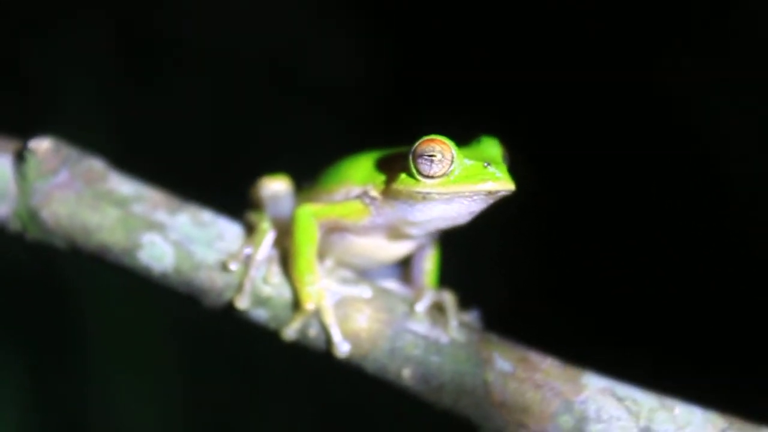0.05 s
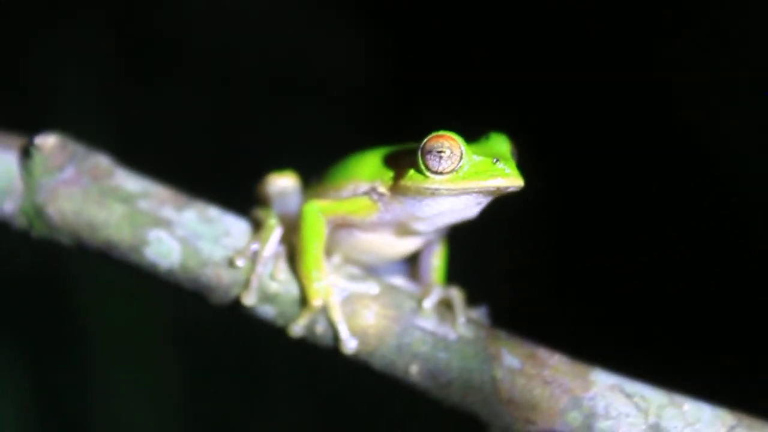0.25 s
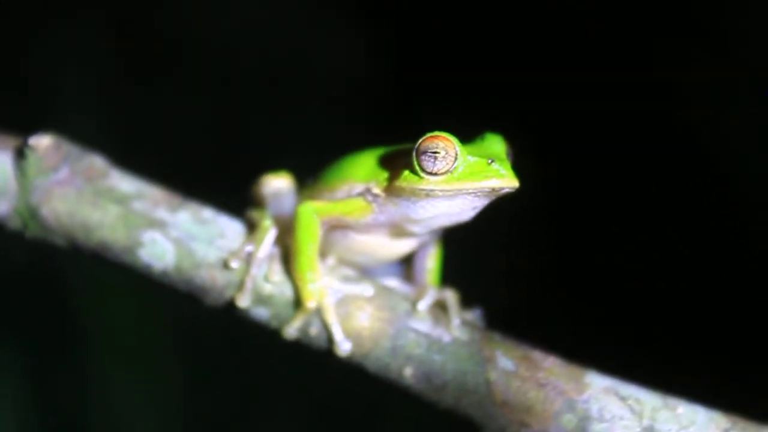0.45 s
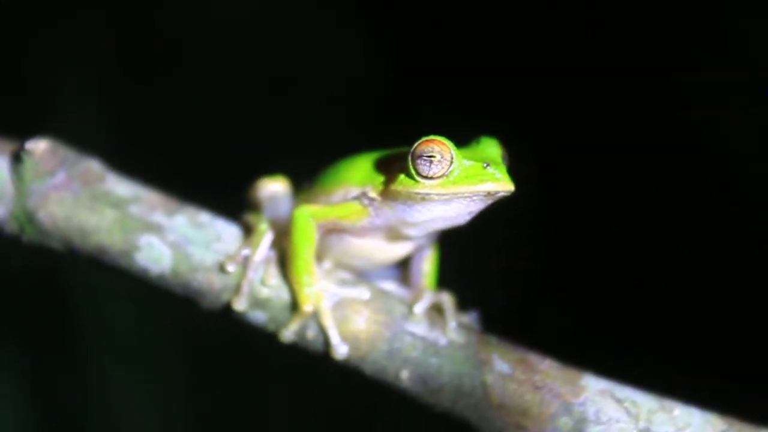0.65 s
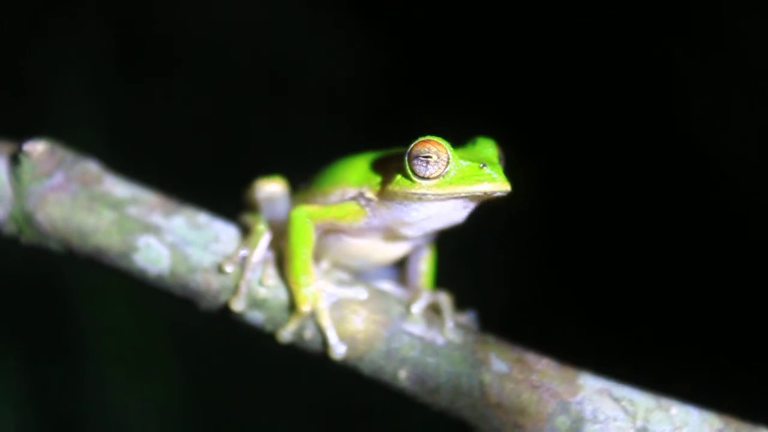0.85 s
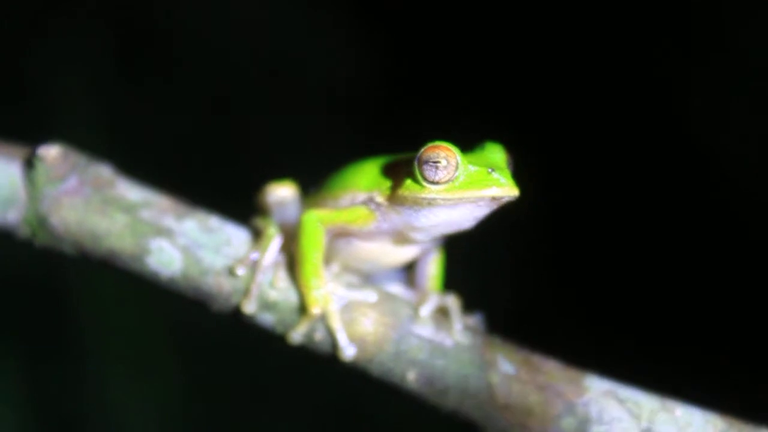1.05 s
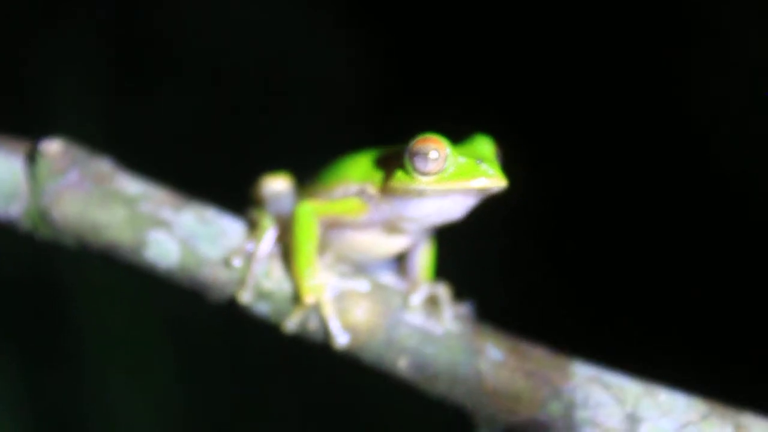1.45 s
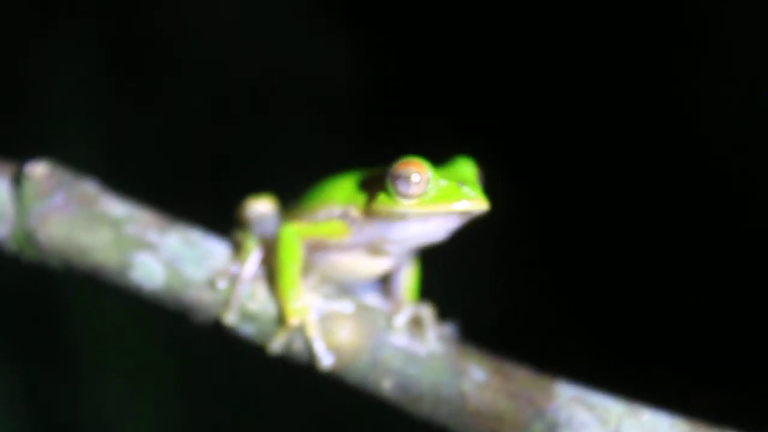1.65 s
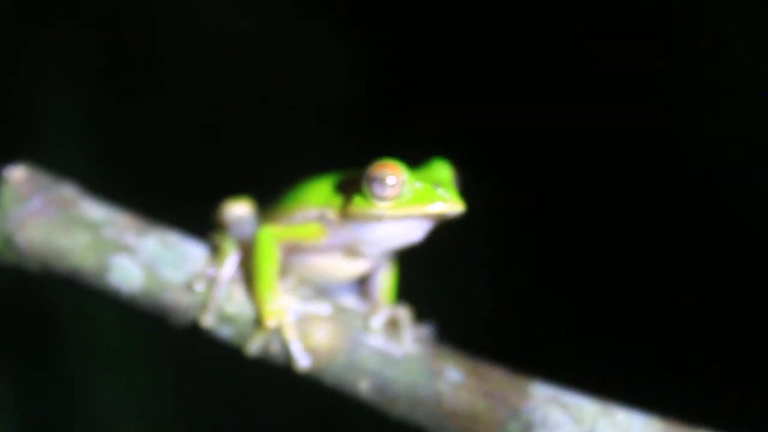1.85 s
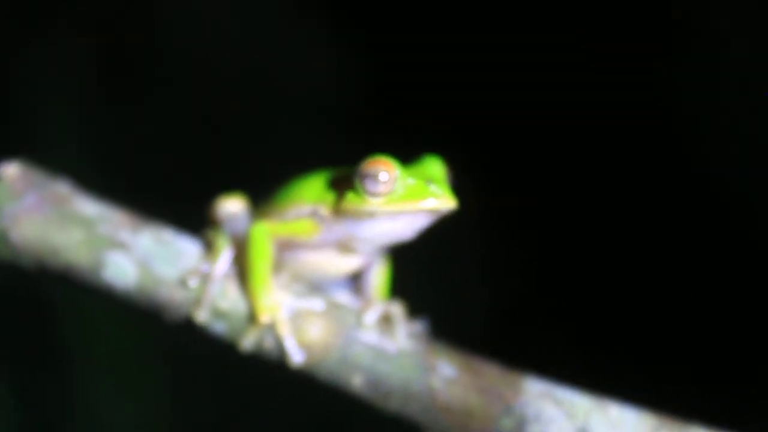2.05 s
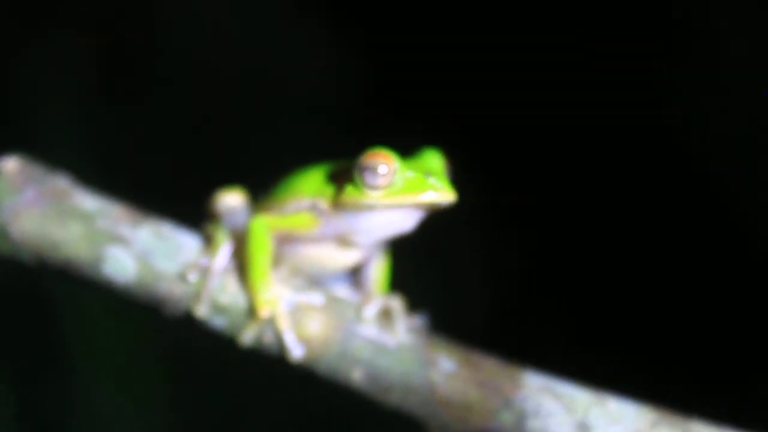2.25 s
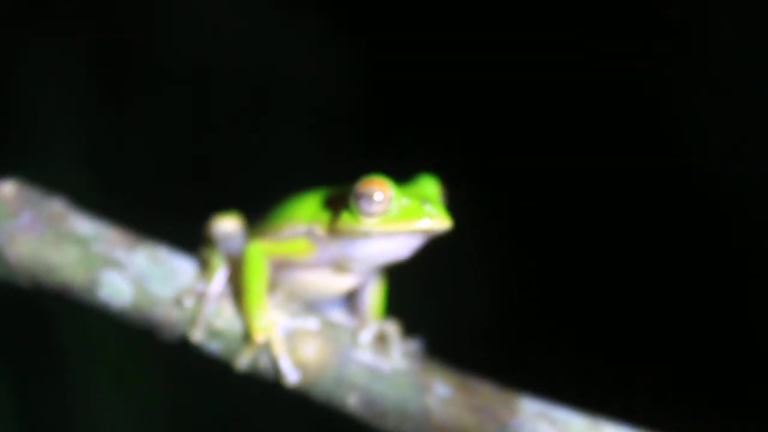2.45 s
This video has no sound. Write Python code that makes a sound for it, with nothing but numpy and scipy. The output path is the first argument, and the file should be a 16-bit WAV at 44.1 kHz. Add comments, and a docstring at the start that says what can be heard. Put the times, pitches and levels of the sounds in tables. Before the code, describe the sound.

Tree frogs rasping, clucking and squeaking at night over a steady insect hum.

```python
"""Tree frogs at night: three swelling rasps, with sharp clucks and thin nasal squeaks between them.
Each call is a pulse train ringing a throat near 3 kHz; a faint high overtone sinks through each rasp.
Foliage scatters the calls briefly. A hand lightly bumps the camera: dull, decaying noise bursts.
Behind: a steady insect band, soft hiss and low rumble, all filtered noise."""
import sys
import numpy as np
from scipy import signal
from scipy.io import wavfile
from scipy.ndimage import uniform_filter1d

SR = 44100
rng = np.random.default_rng(int(sys.argv[2]) if len(sys.argv) > 2 else 0)


def put_to_file(sound):
    """Save the sound as 16-bit audio at rate SR, in the file named by the first command-line argument."""
    columns = np.atleast_2d(sound).T  # one column per channel
    safe = np.clip(columns, -1, 1)
    whole_steps = np.round(safe * 32767)
    wavfile.write(sys.argv[1], SR, whole_steps.astype(np.int16))


N = 114660
TIME_S = np.arange(N) / SR

# envelope per rasp, before the trims in rasp(): time_s, body_db, treble_db
RASP_ENVELOPES = [
    [(0.44, -51, -52), (0.486, -30.5, -49), (0.562, -20.5, -42.5), (0.582, -27, -42.5),
     (0.604, -12.5, -38.5), (0.63, -23, -55), (0.678, -33, -59), (0.69, -44, -56)],
    [(1.21, -25, -56), (1.218, -34, -53), (1.276, -24, -46), (1.292, -35, -52), (1.306, -20.5, -45.5),
     (1.336, -37, -54), (1.342, -27, -41.5), (1.356, -16.5, -51), (1.374, -32.5, -64), (1.39, -35, -74),
     (1.408, -44, -67), (1.42, -49, -74)],
    [(1.78, -49, -72), (1.788, -47, -74), (1.812, -31, -58), (1.856, -32, -53), (1.864, -22, -51),
     (1.918, -26, -47.5), (2.064, -20, -42), (2.072, -30, -53), (2.078, -15.5, -52), (2.094, -18, -37.5),
     (2.128, -15.5, -52), (2.144, -27, -62), (2.15, -46, -54)],
]
# throat per rasp: ring_hz, start_ring_gain, end_ring_gain, median_pulse_hz, slip_cycles
RASP_THROATS = [(3230, 0.18, 2.6, 340, 0.2), (3225, 3.9, 4.3, 440, .15), (3262, 0.3, 3.2, 330, .25)]
# rasp body spectrum: freq_hz, gain_db
RASP_SPECTRUM = [(300, -45), (1500, -29), (1850, -20), (2120, 0), (2450, -6.5), (2850, 3), (3300, -1.5),
                 (3700, -6), (4900, -12), (5800, -17.5), (9000, -49.5)]
# rasp treble spectrum: freq_hz, gain_db
RASP_TREBLE_SPECTRUM = [(2000, -30.5), (4000, -1.5), (5300, 8), (6200, 1), (7500, -1), (9500, -8),
                        (11000, -17), (16000, -7)]
# whistle above each rasp: start_s, end_s, level_db
RASP_OVERTONES = [(0.445, 0.627, -52), (1.18, 1.378, -56), (1.885, 2.142, -52)]
# clucks: start_s, length_s, level_db, pulse_hz, throat_hz, snap_db
CLUCK_CALLS = [(0.3182, .005, -18.5, 590, 2850, -1.5), (0.332, .010, -27, 510, 3450, 3),
               (0.4097, 0.0087, -29.5, 600, 2420, 3.5), (.7838, 0.011, -17.5, 730, 3380, -3),
               (.8133, .004, -20.5, 610, 3150, -13), (0.817, 0.012, -26.5, 380, 3330, 2),
               (0.852, 0.0041, -14.5, 480, 2670, 1), (.8975, 0.00191, -21, 520, 3300, -4),
               (0.9338, 0.0058, -16, 530, 2980, 3), (0.941, .004, -24.5, 650, 3050, 3),
               (1.024, 0.0074, -17.5, 730, 2970, -2.5), (1.1037, 0.0039, -15, 880, 2720, 0),
               (1.1095, 0.0081, -15, 730, 2900, 0), (1.121, 0.005, -19, 610, 2850, -7),
               (1.1907, 0.011, -18.5, 950, 2260, -6.5), (1.34, 0.017, -26, 275, 3440, 0.5),
               (1.463, 0.0036, -30, 640, 2650, -1), (1.756, 0.0093, -42, 600, 2730, -6),
               (1.8637, 0.0039, -21, 732, 2850, -17), (1.867, 0.045, -30, 183, 2130, -8),
               (2.005, 0.0042, -18, 670, 3400, -17), (2.0805, 0.0095, -22.5, 640, 2920, -2),
               (2.151, 0.004, -18, 920, 2760, -14), (2.1573, 0.0043, -28, 680, 2680, -12),
               (2.2054, 0.0037, -25.5, 560, 2600, -11), (2.216, .011, -30, 640, 2950, -11),
               (2.3078, 0.0059, -29.5, 500, 2630, -12)]
# cluck body spectrum: freq_hz, gain_db
CLUCK_SPECTRUM = [(300, -56), (1100, -32.5), (1600, -15.5), (2150, -2), (2700, 1), (3300, 2), (3800, -6.5),
                  (4400, -13.5), (5500, -14), (7000, -23), (10000, -31), (13000, -32.5), (16000, -36)]
# squeaks, near and far: start_s, length_s, level_db, start_hz, middle_hz, end_hz
SQUEAK_CALLS = [(0.077, .07, -46, 492, 509, 476), (0.219, 0.091, -34.5, 432, 499, 464),
                (0.341, 0.066, -38.5, 445, 431, 407), (0.408, 0.071, -34.5, 610, 567.5, 542),
                (0.689, 0.048, -31.5, 622, 645, 678), (0.726, 0.02, -32.5, 560, 579.5, 590),
                (0.745, 0.044, -28.5, 589, 582, 568), (0.797, 0.046, -34.5, 541, 542, 510),
                (0.896, .03, -34, 530, 528, 535), (0.943, 0.046, -33, 530, 523, 480),
                (1.011, .074, -28.5, 501.3, 568.4, 516), (1.126, 0.055, -40, 545.7, 555, 530),
                (1.549, 0.1, -50, 531, 552, 539), (2.159, 0.029, -39, 551, 533, 514),
                (2.212, 0.052, -39.5, 441, 446, 427), (2.31, 0.032, -40.5, 459, 469, 476),
                (2.445, 0.088, -51, 503, 503, 510)]
# squeak body spectrum: freq_hz, gain_db
SQUEAK_SPECTRUM = [(400, -42), (1300, -18), (1700, -14.5), (2200, 0), (2900, 6), (3400, -2.5), (3900, -9.5),
                   (5000, -18.5), (7000, -29.5), (11000, -35), (16000, -37)]
# hand knocks: start_s, gain_db, decay_s
CAMERA_BUMPS = [(1.234, -34.5, 0.0085), (1.260, -37.5, 0.0069), (1.294, -35, 0.0077), (1.308, -37, 0.019),
                (1.34, -33, 0.015)]
# camera body response: freq_hz, gain_db
BUMP_SPECTRUM = [(40, -20), (100, -12), (180, 2), (450, -2.5), (700, -8.5), (1400, -20), (3000, -39)]
# insect band: freq_hz, gain_db
INSECT_SPECTRUM = [(3600, -39), (4150, -11), (4450, -5), (4850, -1), (5100, -6.5), (5450, -21),
                   (6200, -49.5)]
# wide hiss with a low end: freq_hz, gain_db
HISS_SPECTRUM = [(25, -19), (45, -12.5), (87, -3), (185, -3.5), (250, -9.5), (550, -11.5), (1000, -6.5),
                 (1600, -14.5), (2600, -10), (3300, -14), (3800, -22), (5000, -23.5), (6000, -31),
                 (7700, -24), (8500, -28), (14000, -31), (16000, -41)]
# hiss level: time_s, level_db
HISS_ENVELOPE = [(0, -45), (1.3, -44.5), (1.7, -44.5), (2.1, -43), (2.6, -42.5)]
# rumble band: freq_hz, gain_db
RUMBLE_SPECTRUM = [(30, -35), (60, -18.5), (87, 3.5), (140, -6.5), (250, -15.5), (600, -55)]
# rumble level: time_s, level_db
RUMBLE_ENVELOPE = [(0, -67), (1.299, -59), (2.0, -50), (2.6, -50)]

RASP_JITTER, RASP_UNEVEN_DB = 0.33, 0.5
RASP_FLUTTER_GAIN, RASP_FLUTTER_DECAY_S = 0.15, 0.0012
OVERTONE_START_HZ, OVERTONE_END_HZ, OVERTONE_WIDTH_HZ = 15300, 13700, 770
CLUCK_JITTER, CLUCK_RISE_DB, SNAP_ABOVE_HZ = 0.095, 2, 4600
CLUCK_FLUTTER_GAIN, CLUCK_FLUTTER_DECAY_S = 0.049, 0.0029
SQUEAK_RISE_S, SQUEAK_FALL_S, SQUEAK_UNEVEN_DB, SQUEAK_JITTER_CYCLES = 0.0041, 0.012, 2.6, 0.01
FOLIAGE_DB, FOLIAGE_T60_S, FOLIAGE_DELAY_S, FOLIAGE_ECHOES_PER_S = -8.5, 0.13, 0.004, 2500
INSECT_DB, INSECT_FLUTTER_DB, INSECT_FLUTTER_HZ, TRILL_DB = -44.5, 1.63, 89.7, -71
CUTOFF_HZ = 15750


def rasp(envelope, throat):
    """Uneven pulses lock to the ringing throat, so a whistle stands out of the rattle."""
    time_s, body_db, treble_db = np.transpose(envelope)
    ring_hz, start_ring_gain, end_ring_gain, median_pulse_hz, slip_cycles = throat
    t = np.arange(time_s[0], time_s[-1], 1 / SR)
    gap, late, force = rng.standard_normal((200, 3)).T
    pulse_s = np.cumsum(np.exp(RASP_JITTER * gap)) / median_pulse_hz
    pulse_s = (np.round(pulse_s * ring_hz) + slip_cycles * late) / ring_hz  # lock to ring cycles
    inside = pulse_s < time_s[-1] - time_s[0]
    drive = pulses(pulse_s[inside], amp(RASP_UNEVEN_DB * force[inside]), len(t))
    tails = signal.fftconvolve(drive, np.exp(-t[:500] / RASP_FLUTTER_DECAY_S))[:len(t)]
    body = colour(drive + RASP_FLUTTER_GAIN * tails * white()[:len(t)], RASP_SPECTRUM)
    ring_gain = start_ring_gain + (end_ring_gain - start_ring_gain) * (t / t[-1]) ** 2  # t: scene time
    body = flatten_level(body + ring_gain * resonate(body, ring_hz, width_hz=180))
    clicks = unit_rms(colour(drive, RASP_TREBLE_SPECTRUM))
    fizz = unit_rms(colour(body * white()[:len(t)], RASP_TREBLE_SPECTRUM))
    treble = flatten_level(clicks + 2.1 * fizz)
    body *= amp(np.interp(t, time_s, body_db) - 4.0)
    treble *= amp(np.interp(t, time_s, treble_db) + 1.5)
    return time_s[0], body + treble


def overtone(start_s, end_s, level_db):
    """Narrow-band noise: a fuzzy, very high whistle that swells and fades as it sinks."""
    progress = np.arange(0, end_s - start_s, 1 / SR) / (end_s - start_s)
    pitch_hz = OVERTONE_START_HZ + (OVERTONE_END_HZ - OVERTONE_START_HZ) * progress ** 1.8
    whistle = white()[:len(progress)]
    for _ in range(2):
        whistle = resonate(whistle, pitch_hz, OVERTONE_WIDTH_HZ)
    return start_s, amp(level_db) * unit_rms(whistle) * np.sin(np.pi * progress ** 2)


def cluck(start_s, length_s, level_db, pulse_hz, throat_hz, snap_db):
    """A few hard, quick pulses ring the throat and two small resonances above it."""
    gaps_s = np.exp(CLUCK_JITTER * rng.standard_normal(20)) / pulse_hz
    pulse_s = np.r_[0, np.cumsum(gaps_s)]
    pulse_s = pulse_s[pulse_s < length_s]
    size = 2600
    drive = pulses(pulse_s + 1e-4, amp(CLUCK_RISE_DB * pulse_s / length_s), size)
    tails = signal.fftconvolve(drive, np.exp(-TIME_S[:size] / CLUCK_FLUTTER_DECAY_S))[:size]
    drive += CLUCK_FLUTTER_GAIN * tails * white(size)
    body = colour(drive, [(hz, db + snap_db * (hz > SNAP_ABOVE_HZ)) for hz, db in CLUCK_SPECTRUM])
    ring = 1.9 * resonate(body, throat_hz, width_hz=350)
    upper_ring = 0.41 * resonate(body, centre_hz=6120, width_hz=210)
    ping = 2.0 * resonate(body, centre_hz=12840, width_hz=500)
    call = body + ring + upper_ring + ping
    return start_s, amp(level_db) * call / np.linalg.norm(call) * np.sqrt(length_s * SR)


def squeak(start_s, length_s, level_db, start_hz, middle_hz, end_hz):
    """Near-regular pulses on a parabolic pitch glide: a thin nasal note."""
    t = np.arange(0, length_s, 1 / SR)
    glide = np.polyfit([0, length_s / 2, length_s], [start_hz, middle_hz, end_hz], 2)
    cycles = np.cumsum(np.polyval(glide, t)) / SR
    late, force = rng.standard_normal((100, 2))[:int(cycles[-1])].T
    pulse_s = np.interp(np.arange(len(late)) + SQUEAK_JITTER_CYCLES * late, cycles, t)
    drive = pulses(pulse_s, amp(SQUEAK_UNEVEN_DB * force), len(t))
    rise = np.minimum(t / SQUEAK_RISE_S, 1)
    fall = np.minimum((length_s - t) / SQUEAK_FALL_S, 1) ** 0.37
    return start_s, amp(level_db) * unit_rms(rise * fall * colour(drive, SQUEAK_SPECTRUM))


def foliage(calls):
    """Many small, fast-dying reflections off leaves and trunks."""
    t = np.arange(SR // 3) / SR
    echoes = white(len(t)) * (rng.random(len(t)) < FOLIAGE_ECHOES_PER_S / SR)
    echoes *= (t > FOLIAGE_DELAY_S) * amp(-60 * t / FOLIAGE_T60_S)
    return amp(FOLIAGE_DB) * signal.fftconvolve(calls, echoes / np.linalg.norm(echoes))[:N]


def bump(start_s, gain_db, decay_s):
    """Dull knock of a hand on the camera body."""
    t = np.arange(SR // 6) / SR
    burst = white(len(t)) * np.exp(-t / decay_s)
    return start_s, amp(gain_db) * colour(burst, BUMP_SPECTRUM)


def insects():
    """Distant chorus: a fluttering band near 5 kHz and a faint higher trill."""
    flutter = np.interp(TIME_S * INSECT_FLUTTER_HZ, np.arange(N), white())
    chorus = unit_rms(noise(INSECT_SPECTRUM) * amp(INSECT_FLUTTER_DB * flutter))
    trill = unit_rms(resonate(white(), centre_hz=7800, width_hz=200))
    return amp(INSECT_DB) * chorus + amp(TRILL_DB) * trill


def night_air():
    """Wide hiss and a slowly growing low rumble."""
    hiss = noise(HISS_SPECTRUM) * amp(np.interp(TIME_S, *np.transpose(HISS_ENVELOPE)))
    rumble = noise(RUMBLE_SPECTRUM) * amp(np.interp(TIME_S, *np.transpose(RUMBLE_ENVELOPE)))
    return hiss + rumble


def amp(db):
    return 10 ** (np.asarray(db) / 20)


def unit_rms(x):
    return x / np.sqrt(np.mean(x ** 2) + 1e-20)


def white(size=N):
    return rng.standard_normal(size)


def noise(spectrum):
    return unit_rms(colour(white(), spectrum))


def add(mix, start_s, sound):
    part = mix[max(round(start_s * SR), 0):][:len(sound)]
    part += sound[:len(part)]


def colour(x, spectrum):
    """Minimum-phase filter of unit energy."""
    hz, db = np.transpose(spectrum)
    bins_hz = abs(np.fft.fftfreq(4096, 1 / SR))
    log_gain = np.log(amp(np.interp(np.log(bins_hz + 1), np.log(hz), db)))
    response = np.exp(np.conj(signal.hilbert(log_gain)))
    taps = np.fft.ifft(response).real[:2048]
    return signal.fftconvolve(x, taps / np.linalg.norm(taps))[:len(x)]


def resonate(x, centre_hz, width_hz):
    """Unity-gain resonance, steady or gliding."""
    carrier = np.exp(2j * np.pi * np.cumsum(centre_hz * np.ones(len(x))) / SR)
    pole = np.exp(-np.pi * width_hz / SR)
    return 2 * (carrier * signal.lfilter([1 - pole], [1, -pole], x / carrier + 1e-18)).real


def pulses(times_s, heights, size):
    """Windowed-sinc pulses with sub-sample timing."""
    train = np.zeros(size)
    index = np.floor(times_s * SR).astype(int)[:, None] + np.arange(-3, 5)
    offset = index - times_s[:, None] * SR
    shapes = heights[:, None] * np.sinc(offset) * np.sinc(offset / 4)
    np.add.at(train, np.clip(index, 0, size - 1), shapes)
    return train


def flatten_level(x, window_samples=700):
    """Holds the running rms near 1; single pulses survive."""
    power = uniform_filter1d(uniform_filter1d(x ** 2, window_samples), window_samples)
    return x / np.sqrt(abs(power) + 1e-4 * np.mean(x ** 2))


def scene():
    """Mono mix: frogs, reflections, bumps, night background."""
    frogs, bumps = np.zeros(N), np.zeros(N)
    for envelope, throat in zip(RASP_ENVELOPES, RASP_THROATS):
        add(frogs, *rasp(envelope, throat))
    for call, table in [(overtone, RASP_OVERTONES), (cluck, CLUCK_CALLS), (squeak, SQUEAK_CALLS)]:
        for row in table:
            add(frogs, *call(*row))
    for row in CAMERA_BUMPS:
        add(bumps, *bump(*row))
    return (frogs + foliage(frogs) + bumps + insects() + night_air())[None]


def record(dry):
    """Low-pass band limit."""
    lowpass = signal.firwin(401, CUTOFF_HZ, window=("kaiser", 9), fs=SR)
    return signal.oaconvolve(dry, lowpass[None], "same")


dry = scene()
out = record(dry)
put_to_file(out)
```